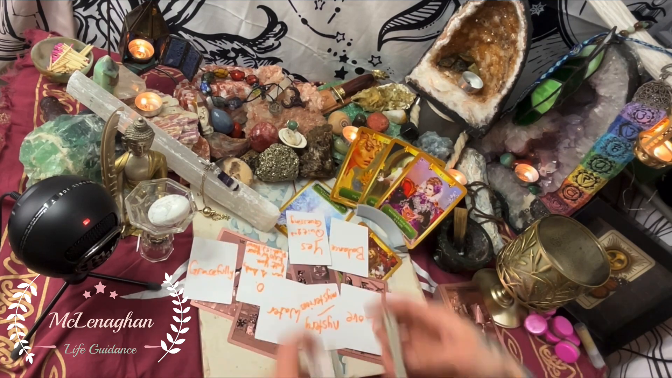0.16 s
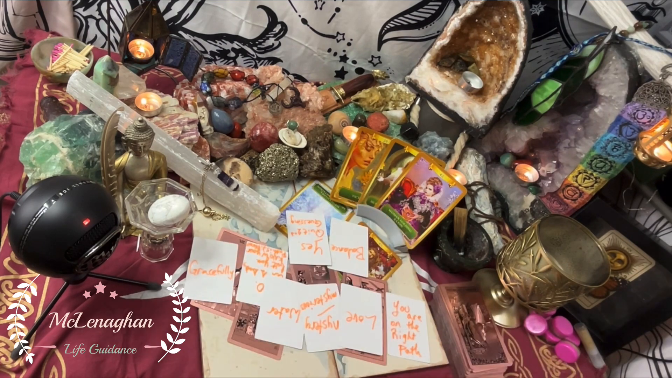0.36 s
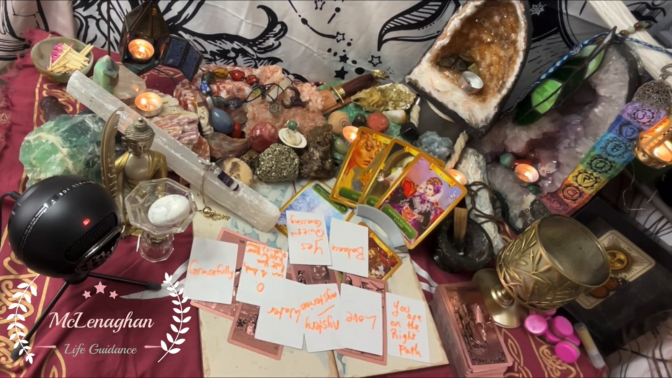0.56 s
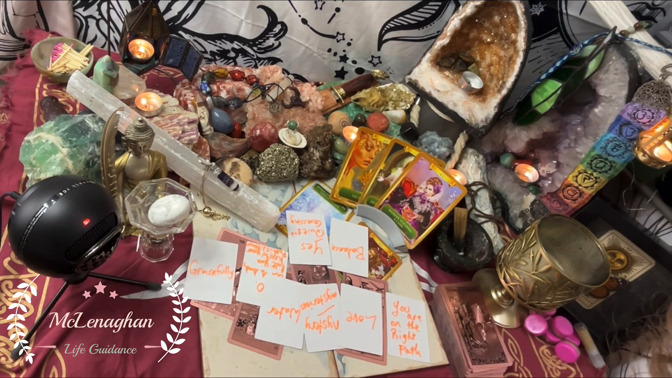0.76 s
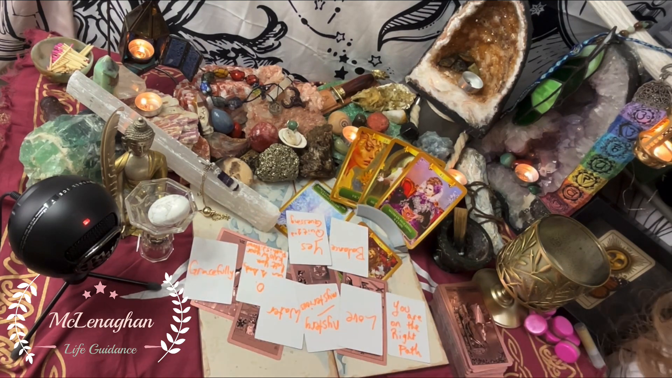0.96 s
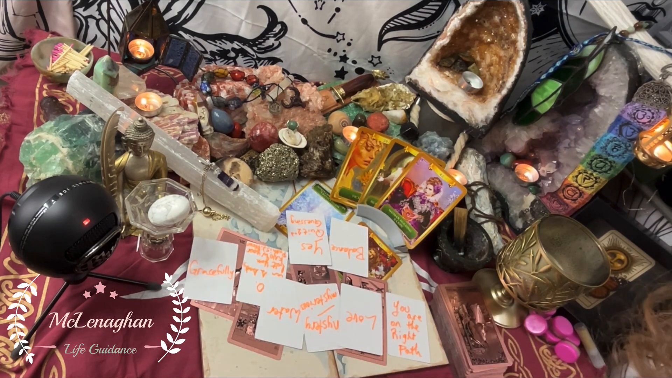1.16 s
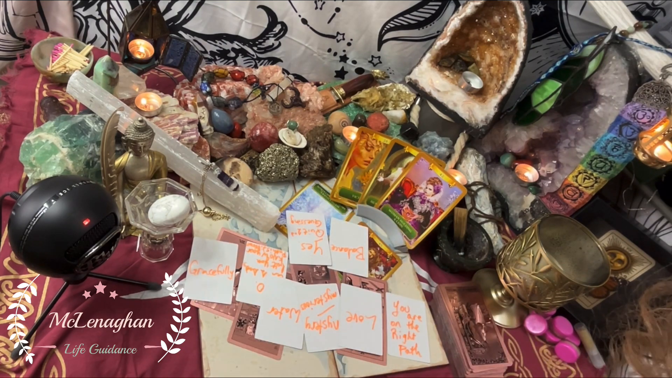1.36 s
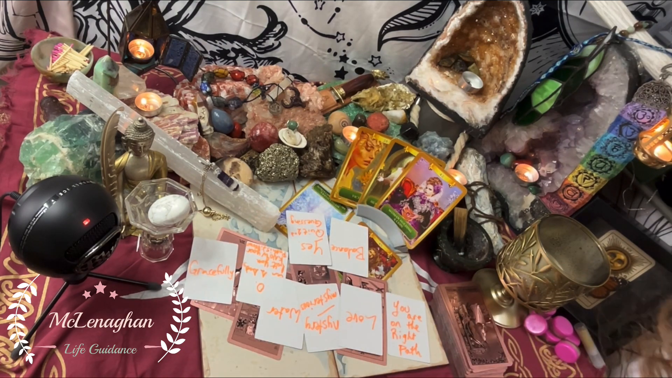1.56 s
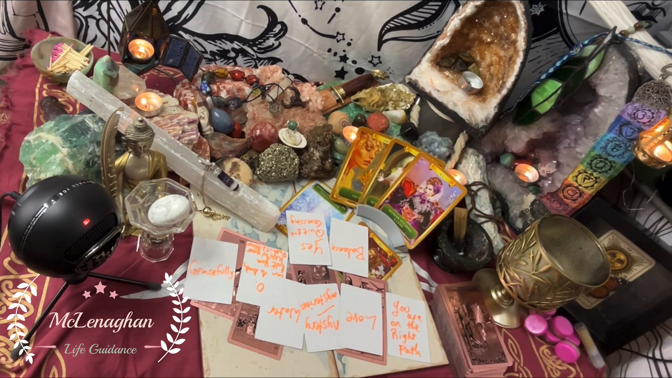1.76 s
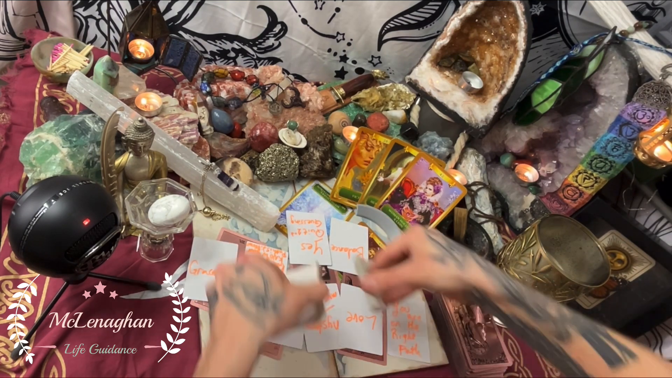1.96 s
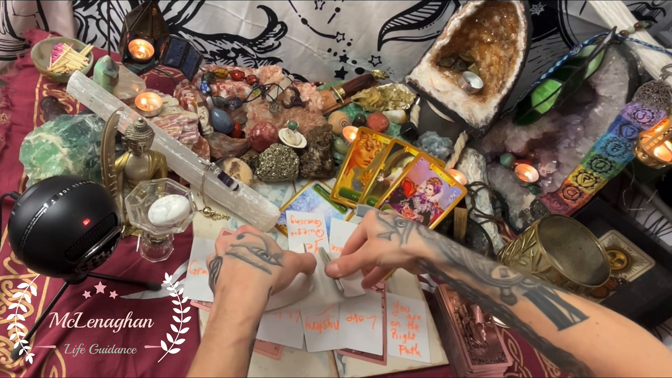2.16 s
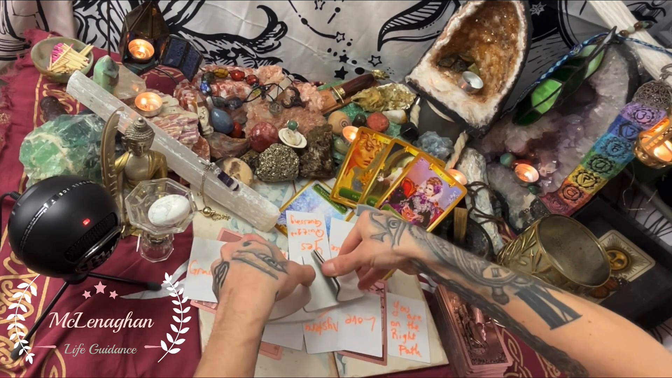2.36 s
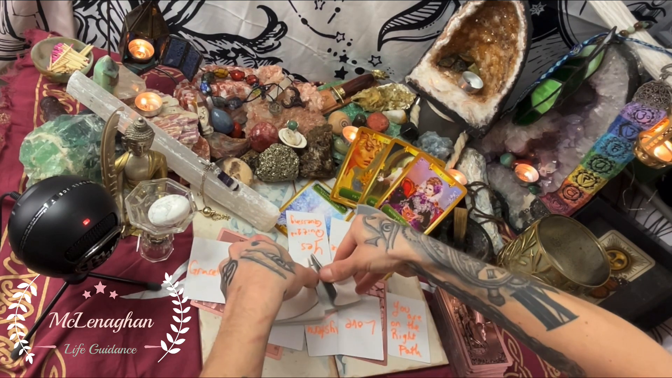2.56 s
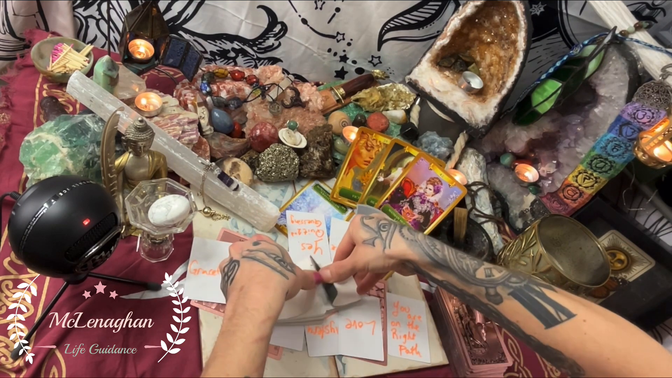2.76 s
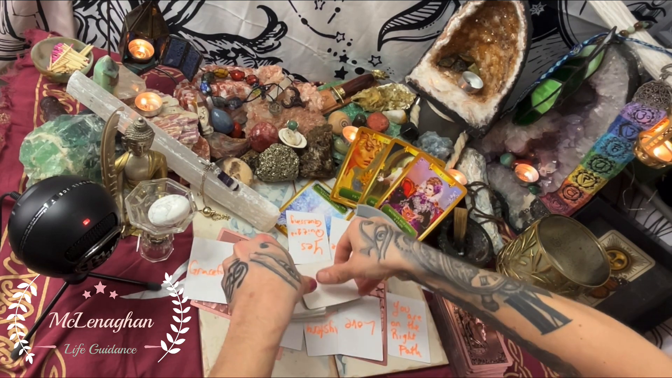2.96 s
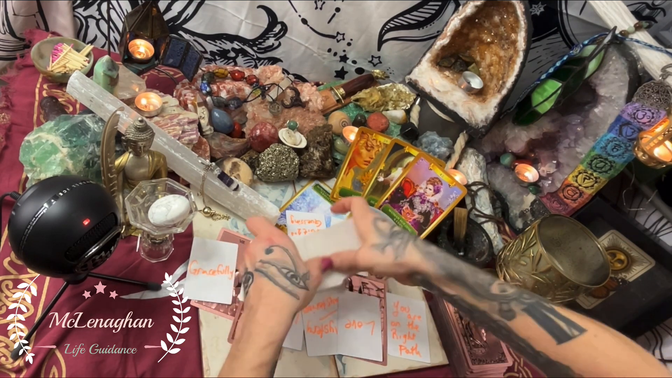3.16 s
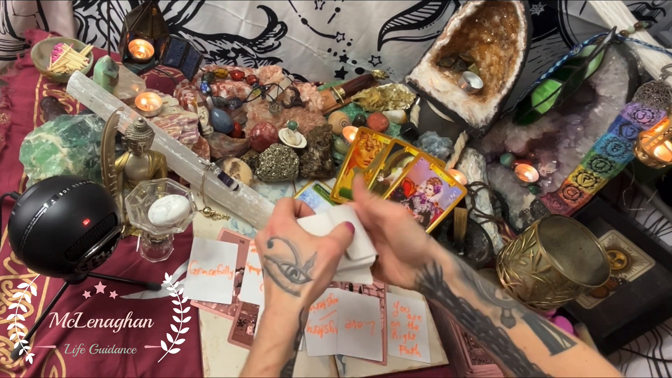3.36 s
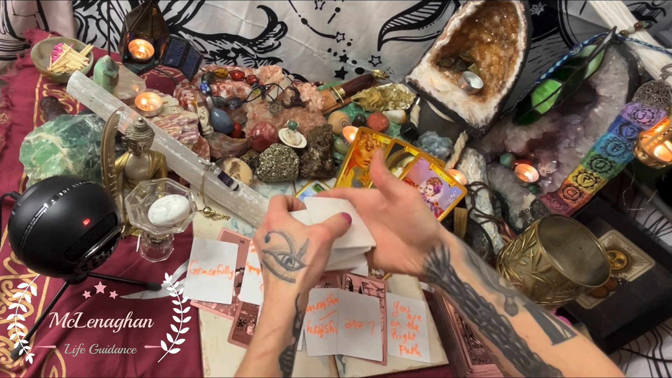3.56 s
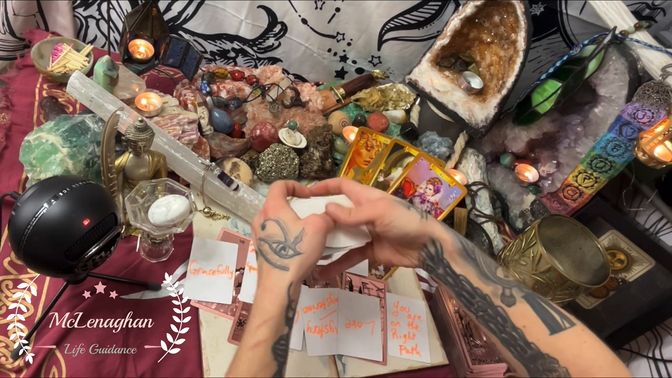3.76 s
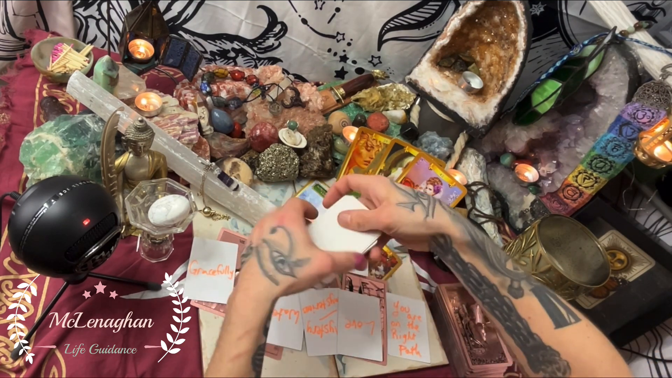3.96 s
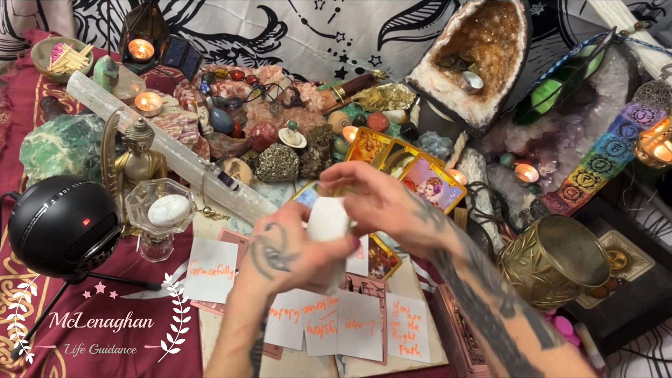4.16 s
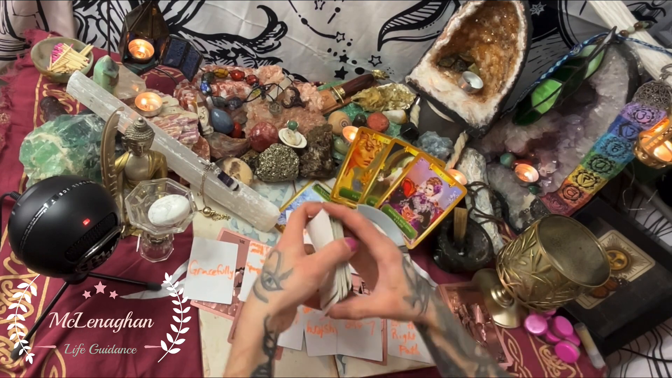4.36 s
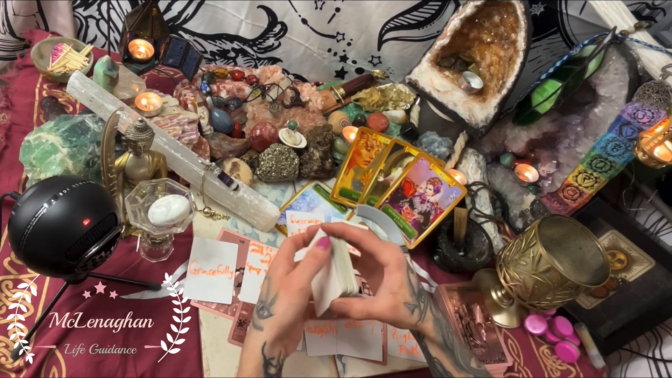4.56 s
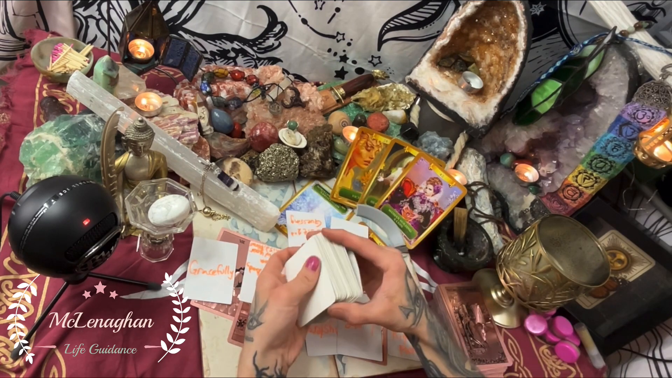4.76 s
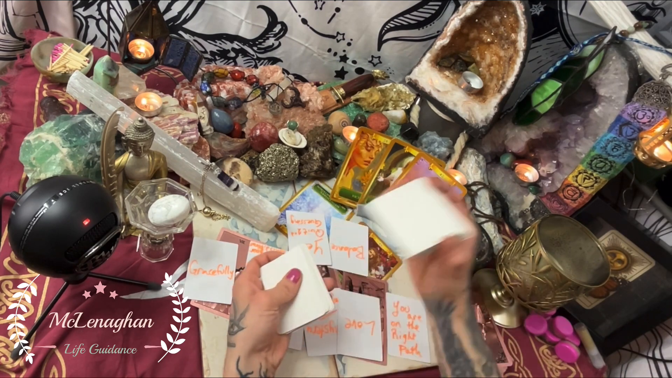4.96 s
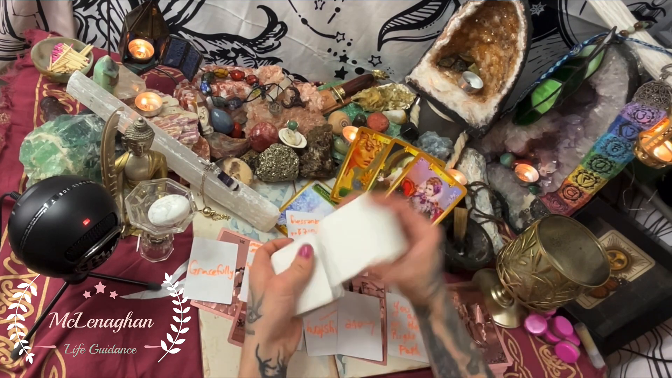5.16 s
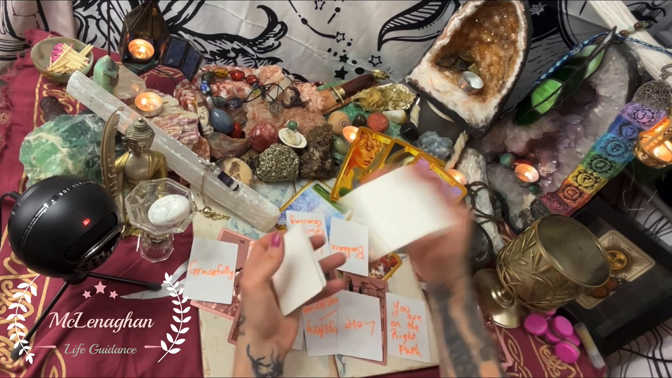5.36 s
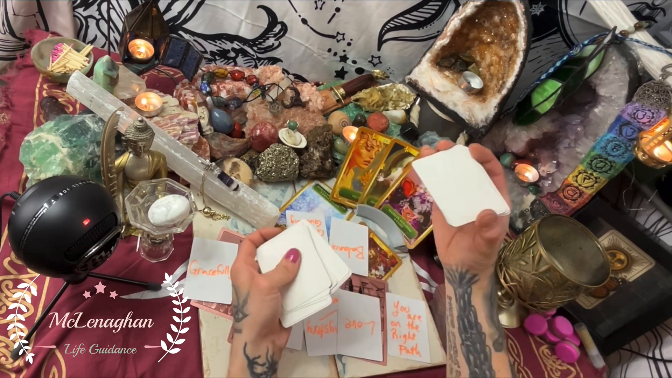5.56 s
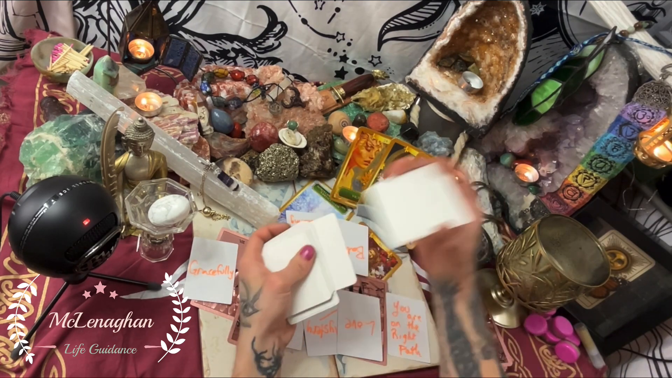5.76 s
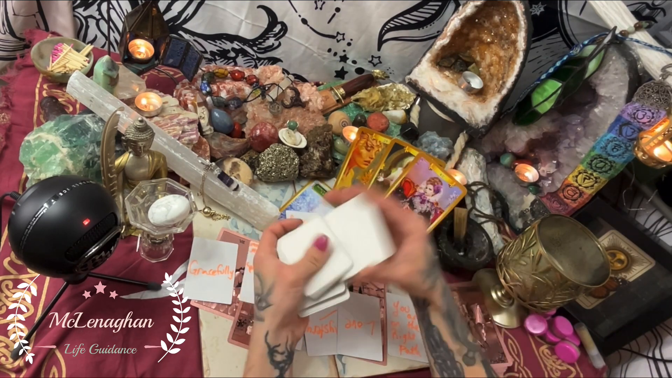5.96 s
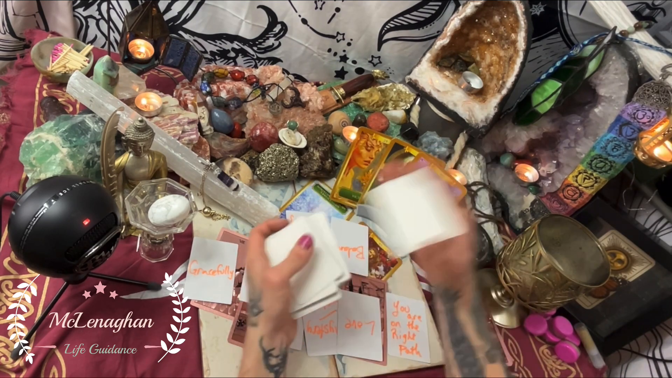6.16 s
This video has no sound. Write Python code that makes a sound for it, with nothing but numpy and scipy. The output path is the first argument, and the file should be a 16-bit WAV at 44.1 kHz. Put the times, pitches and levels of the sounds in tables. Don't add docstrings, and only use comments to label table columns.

```python
import sys
import numpy as np
from scipy import signal
from scipy.fft import rfft, irfft
from scipy.io import wavfile
from scipy.ndimage import uniform_filter1d

SR = 44100
rng = np.random.default_rng(int(sys.argv[2]) if len(sys.argv) > 2 else 0)


def voltage_ratio(level):
    return 10 ** (np.asarray(level, float) / 20)


def materialize(psi):
    bounded = np.clip(np.atleast_2d(psi).T, -1, 1)
    quanta = np.round(bounded * 32767).astype(np.int16)
    wavfile.write(sys.argv[1], SR, quanta)


N = 274331

RIFFLE_SLAPS = [(2.1687, -36, 3, 880, -4.5), (2.1812, -25.5, 3, 1230, -6.5), (2.1865, -29.5, -1, 970, -5),
                (2.1992, -28, 3, 2870, -10), (2.3075, -34, -11, 780, -16), (2.3157, -25, 0, 1050, -6),
                (2.3204, -26, -6.5, 750, -8), (2.4161, -40, -3, 1130, -6), (2.4296, -36.5, -3, 1110, -8.5),
                (2.5212, -24.5, -2, 3160, -6), (2.5408, -20.5, -7, 3180, -14),
                (2.5613, -29, -16.5, 2580, -5.5), (2.651, -26.5, 0, 845, -11),
                (2.6663, -20, -7.5, 1240, -17), (2.678, -28.5, 2, 1090, -3.5),
                (2.6857, -28.5, -2.5, 1190, -1), (2.6993, -24, -3.5, 1190, -14), (2.703, -28, 1, 980, -11),
                (2.7805, -38.5, -3, 960, -5), (2.7862, -17, 1, 1030, -9.5), (2.7948, -45, 4, 1150, -5),
                (2.9041, -19.5, -0.5, 5070, -3.5), (2.907, -21, 5.5, 1136, -5)]
EDGE_TICKS = [(0.3463, -46, 9, 1340, -20), (1.6478, -48, 4, 750, -13), (1.7087, -55.5, 0, 1100, -3),
              (2.2031, -20, -10, 2870, -10), (2.3531, -39, 1, 605, -11), (2.4822, -39, -11, 2910, -4),
              (2.4912, -42, -12, 2970, -6), (2.5174, -30, -5, 4400, -2), (2.5334, -19, -10.5, 2910, 2.5),
              (2.5494, -23, -2, 800, -10), (2.6605, -22, -6.5, 2160, -13), (2.6961, -19.5, 1.5, 4300, -8),
              (2.8489, -28, -12, 2080, -12), (2.8583, -35, -5, 647, -7), (3.0327, -44, 3, 7000, -11),
              (3.1899, -49, 0, 6000, -9), (3.2089, -42.5, -1, 5150, -3.5), (3.3241, -29.5, -3, 7360, -4),
              (3.3946, -34, 8.5, 4130, -31), (3.5578, -29.5, -3, 2870, -13), (3.5781, -50, 4, 8000, 1),
              (3.6025, -39, -1, 2980, -10), (3.7993, -49, -1, 8000, -4), (4.1243, -36, 0, 2700, -3.5)]
EDGE_FLICKS = [(4.1669, -39.5, -1, 1000, -12), (4.7599, -40.5, 7, 4360, -11),
               (4.8961, -44.5, 2, 4250, -8.5), (2.1915, -26, 18, 1930, -3),
               (5.1901, -30.5, 5, 2720, -7), (5.2068, -38, 3, 5000, -10), (5.4199, -28, -1, 4500, -13),
               (5.4275, -43.5, 0, 960, 5), (5.4379, -32.5, -2, 1110, -10), (5.4411, -38, 2, 1310, -1.5),
               (5.4492, -31, -2, 4500, -27), (5.4703, -46, -13, 2930, -4), (5.4819, -35, 6, 690, -18),
               (5.5015, -38.5, -4, 654, -6.5), (5.7311, -37, -2, 5300, -0.5),
               (5.7353, -33.5, 6, 880, -9), (5.7428, -38, -1, 930, -5), (5.9583, -36, -1.5, 1320, -16),
               (5.9617, -33, -8, 810, -10), (5.9806, -27, -7, 680, -12.5), (5.9857, -39, 18, 675, -8),
               (5.9947, -31.5, 10, 1230, -13), (3.6692, -28.5, 9, 3850, -10),
               (6.2168, -25, 1, 1910, -2)]
HAND_TOUCHES = [(1.374, -52, 2, 1080, -20), (3.107, -41.5, -11, 760, -11.5), (3.2515, -49, -9, 796, -8),
                (3.3255, -32.5, -15, 684, -4), (3.4913, -50, 4, 4000, -10), (3.5042, -31.5, -5, 2330, -3.5),
                (3.6187, -40, -12, 2520, -13), (3.6379, -45, -4, 3860, -2), (3.8235, -47, 2, 2460, -1),
                (4.5285, -47, 9, 3620, -7), (4.6197, -53.5, 1, 1010, -11), (4.8288, -50.5, -5, 2570, 2.5),
                (5.164, -43.5, 0, 940, -6.5), (5.4237, -33.5, -5, 2470, -1.5),
                (5.6998, -27.5, -1, 2160, -10.5), (5.7086, -28, -7, 2300, -12),
                (5.7139, -33.5, 15, 2440, -4), (5.7216, -41, 2, 2550, -5), (5.7505, -38.5, 2, 550, -1),
                (5.9912, -47, -22, 503, 9.5), (5.9995, -48.5, 2, 1083, 16)]
CLUSTER_CARDS = [(2.147, -50, -3, 1100, -3), (2.1585, -43.5, -6, 900, -4), (2.1788, -28, 11, 3180, -8),
                 (2.1925, -23, -8, 2980, -4.5), (2.3045, -42, 2, 6000, -10),
                 (2.3165, -27.5, -15.5, 2760, 1.5), (2.433, -41, 8, 1160, -5), (2.44, -43, -8, 3000, -4),
                 (2.4505, -48, -10, 900, 3), (2.5305, -29, 4, 4700, -6), (2.5375, -26, -10, 920, -10),
                 (2.649, -33, 2, 2500, -16), (2.6752, -25, 0, 2250, -7), (2.684, -31.5, 2, 1090, -6),
                 (2.783, -28, 6, 2000, -12), (2.9022, -25.5, 9, 6550, -5), (3.3262, -34.5, -17, 1240, 1.5),
                 (3.4955, -38, -4, 2270, -5), (3.5005, -34.5, -9, 1950, -5), (3.503, -28.5, -3, 4140, -6.5),
                 (3.5095, -39, -6, 2900, 1), (3.5135, -42, -4, 2500, 1), (3.52, -54, -6, 2500, 9),
                 (5.1715, -44, -5, 1300, -8), (5.4257, -33, -3, 1900, -1), (5.4283, -39, -2, 1310, -2.5),
                 (5.452, -39, 8, 8000, -7), (5.7008, -25.5, -3.5, 2320, 0.5), (5.978, -48, 8, 3000, -12),
                 (5.9965, -36, -12, 1470, -12)]
LOOSE_CARDS = [(3.038, -40, -14, 1200, -8), (3.054, -53, 8, 10000, -2), (3.068, -53, 1, 4000, -6),
               (3.2525, -55, 6, 9600, 2), (3.272, -54, -4, 2520, 3), (3.568, -52, 6, 7800, 2),
               (3.5745, -52, 4, 8000, 5), (3.5885, -51, 6, 8200, 4), (3.606, -45, 6, 8500, -3),
               (3.6155, -52, 6, 8000, 2), (3.6215, -53, 6, 8100, 1), (3.628, -51, 6, 8200, 5),
               (3.655, -53, 2, 4200, 3), (3.774, -59, 0, 4300, 0), (3.7925, -56, 0, 4500, -3),
               (3.7965, -50.5, -3, 2340, 2), (3.804, -51, -4, 4800, -2), (3.8225, -50, 5, 8300, 3),
               (3.8325, -44, -2, 2480, 1.5), (3.8515, -48.5, 2, 10000, -7), (4.904, -51, 1, 4200, -6),
               (4.1238, -47, 19, 14500, 5), (4.913, -60, 12, 14000, -2), (5.4375, -45, 0, 2300, -4)]
SLAP_MS, TICK_MS, FLICK_MS, TOUCH_MS = 2.8, 1, 0.76, 3.1
CLUSTER_MS, LOOSE_MS = 1.3, 0.96
# (time [s], peak [dB], brightness [dB], first swing [sign])
CORNER_SPIKES = [(2.1921, -14, 4, 1), (2.2031, -8.5, -2, -1), (2.3167, -18, 5, 1), (2.3492, -29, 3, -1),
                 (2.4645, -33, 10, 1), (2.5427, -28, -7, -1), (2.5494, -23, 5, 1), (2.6666, -13, 1, 1),
                 (2.6782, -12, 2, 1), (2.6858, -10, 1, 1), (2.7031, -13, 2, -1), (2.7862, -12, 10, 1),
                 (2.9047, -16, 2, 1), (2.9070, -3.5, -2, 1), (4.1244, -35, -2, 1), (4.1672, -27, -4, 1),
                 (5.2068, -22, 4, -1), (5.4211, -27, 3, 1), (5.4243, -32, 0, 1), (5.4411, -24, -4, -1),
                 (5.9806, -18.5, -9, -1), (5.9857, -27, 5, 1), (5.9947, -25, 8, -1), (3.0328, -27, 3, 1),
                 (3.107, -34, -1, 1), (6.2167, -16, 8, -1), (5.4247, -20, -7, -1)]
# (frequency [Hz], level [dB])
CRACK_SPECTRUM = [(60, -76), (350, -16.5), (800, -6), (3000, 2), (6000, -0.5), (10000, -0.5), (13000, -7.5),
                  (16000, -8)]

# (middle [s], level [dB], length [ms], brightness [dB])
FACE_STROKES = [(2.43, -52, 22, -2), (2.491, -52.5, 38, -4), (2.853, -46, 15, 10), (3.034, -47.5, 28.5, 0),
                (3.117, -50, 33, 4), (3.23, -59, 89, 1), (3.263, -59, 40, 8), (3.321, -43, 12, -4),
                (3.406, -57.5, 270, 1), (3.503, -36.5, 20.5, 4.5), (3.548, -48.5, 31, 5),
                (3.613, -49, 39, -5), (3.799, -57.5, 74, 3), (3.83, -52, 28, -2), (4.058, -58, 100, 4.5),
                (4.164, -54, 21, 7), (4.353, -51, 29, 3), (4.385, -59, 18, -4), (4.438, -49.5, 31, 3.5),
                (4.487, -54.5, 26, 2), (4.528, -49, 31, 3.5), (4.708, -60, 99, 3), (4.893, -52.5, 21, 6),
                (5.169, -51, 11, 12), (5.444, -47.5, 27, 1), (5.49, -68, 56, 4), (5.926, -57.5, 17, 3),
                (5.987, -45, 12, -13)]
# (middle [s], level [dB], length [ms])
FINGER_BRUSHES = [(0.025, -61.5, 45), (0.119, -61, 90), (0.337, -57.5, 64), (0.457, -58.5, 29),
                  (0.564, -62, 27), (0.634, -68.5, 110), (0.836, -55.5, 62), (0.974, -60.5, 73),
                  (1.075, -63, 42), (1.15, -68, 40), (0.243, -64.5, 26), (1.382, -63, 26), (1.529, -64, 35),
                  (2.009, -64, 14), (2.034, -66, 9.2), (2.14, -63, 14), (4.26, -72, 170), (3.674, -65, 65),
                  (3.916, -66, 71), (4.128, -55.5, 45), (4.764, -51, 6.9), (4.81, -57, 46),
                  (4.855, -57.5, 51), (5.036, -57.5, 17), (5.315, -61, 19), (5.359, -63, 22),
                  (5.82, -69.5, 420), (6.115, -62.5, 60), (6.065, -64, 34), (6.198, -60.5, 22),
                  (5.681, -59, 34), (5.14, -64.5, 96)]
BRUSH_BRIGHT_DB = 7
# (frequency [Hz], level [dB])
BENDING_SPECTRUM = [(900, -24), (2300, -9), (3200, -12), (4100, -2), (5000, -6), (6000, -2), (8000, -20)]
# (frequency [Hz], level [dB])
SKIN_SPECTRUM = [(4500, -63), (6200, -21.5), (7200, -9.5), (8500, -7), (10000, -7), (11500, -10.5),
                 (13500, -9.5), (16000, -13)]

# (time [s], peak [dB],
# frequency [Hz], first swing [sign])
AIR_PUFFS = [(2.176, -28.5, 56, 1), (2.3172, -25.5, 52.5, -1), (2.531, -40, 49.3, 1), (2.652, -34, 110, -1),
             (2.672, -29, 118, 1), (2.782, -44, 60, 1), (2.846, -36, 139, -1), (2.854, -27, 133, 1),
             (2.899, -48, 110, 1), (3.318, -64, 100, -1), (2.906, -17.5, 570, 1), (2.32, -24.5, 100, -1),
             (3.3226, -18, 437, -1), (4.898, -41.5, 61, -1), (5.204, -35, 56, -1), (5.479, -31, 54.6, -1),
             (5.495, -28, 61, 1), (5.695, -39, 69.6, 1), (5.746, -21, 54, 1), (5.971, -37, 80, -1),
             (5.992, -28.5, 74.4, 1), (6.2165, -25, 90, -1)]

# (time [s], quick sway [dB], slow sway [dB])
TABLE_BUMPS = [(0.5, -72, -40), (2.17, -33, -50), (2.32, -24, -45), (2.37, -32, -44), (2.5, -28.5, -38),
               (2.74, -41, -39), (2.86, -47, -33), (2.95, -35, -46), (3.4, -72, -44.5), (4.2, -45, -52),
               (5.9, -75, -46)]
QUICK_HZ, QUICK_RISE_S, QUICK_FADE_S = 38, 0.025, 0.11
SLOW_HZ, SLOW_RISE_S, SLOW_FADE_S = 17.5, 0.037, 0.32
REST_DB = -63

# (frequency [Hz], density [dB per Hz])
FAN_AIR = [(18, -7), (30, -0.5), (156, -8), (214, -2.5), (293, -6.5), (423, -2.5), (535, -14.5),
           (626, -7.5), (772, -14), (1240, -8), (1980, -19), (2510, -18), (3180, -26.5), (9800, -35.5),
           (15700, -44)]
FAN_AIR_DB = -52.5
# (frequency [Hz], width [Hz], level [dB])
FAN_DUCT = [(350, 35, -70), (652.5, 20, -69.5), (1193, 360, -61)]
# (shaft order, level [dB])
SHAFT_ORDERS = [(2, -65), (3, -71), (4, -58), (6, -91), (8, -80), (12, -65.5)]
SHAFT_HZ = 52.26

# (frequency [Hz], t60 [s])
ROOM_T60 = [(200, 0.31), (1000, 0.23), (4000, 0.2), (14000, 0.14)]
# (frequency [Hz], level [dB])
PHONE_LIMIT = [(15800, 0), (15950, -30), (16700, -36), (16950, -60)]


def evened(x):
    return x / np.sqrt(np.mean(x ** 2) + 1e-20)


def read(points, hz):
    f, value = np.transpose(points)
    return np.interp(np.log(hz + 1), np.log(f + 1), value)


def add(mix, s, sound):
    part = mix[max(round(s * SR), 0):][:len(sound)]
    part += sound[:len(part)]


def coloured(x, points, tilt_db=0):
    hz = np.fft.rfftfreq(len(x), 1 / SR)
    gain_db = read(points, hz) + tilt_db * np.log2((hz + 50) / 7000)
    return evened(irfft(rfft(x) * voltage_ratio(gain_db), len(x)))


def resonate(x, hz, width_hz):
    r = np.exp(-np.pi * width_hz / SR)
    return signal.lfilter([1 - r], [1, -2 * r * np.cos(2 * np.pi * hz / SR), r * r], x)


def drift(hz):
    lowpass = signal.butter(2, hz, fs=SR, output="sos")
    return evened(signal.sosfilt(lowpass, rng.standard_normal(N)))


def snaps(rows, tear_ms):
    out, t = np.zeros(N), np.arange(2048) / SR
    noise = rng.standard_normal((len(rows), 3, 2048))
    tear_s = max(tear_ms, .1) / 1000
    rise = 1 - np.exp(-(t / (.45 * tear_s + .0002)) ** 2)
    fall = np.exp(-t / (.9 * tear_s + .0004)) + 0.13 * np.exp(-t / 0.0072)
    shape = np.roll(rise * fall, 64)
    for (s, db, bright_db, hz, ring_db), (hiss, grit, knock) in zip(rows, noise):
        gritty = hiss * voltage_ratio(5.6 * np.clip(grit, -2, 1.5)) * shape
        crack = coloured(gritty, CRACK_SPECTRUM, 0.64 * bright_db) * np.sqrt(np.mean(shape ** 2))
        push = knock * shape ** 1.06
        push[70] += 6.0
        packet = evened(resonate(push, hz, 0.085 * hz + 110))
        whole_deck = evened(resonate(push, 1200, 340))
        ring = packet + 0.31 * min(3000 / hz, 1) ** 2 * whole_deck
        ring *= 1.574 / (abs(ring).max() + 1e-12)
        add(out, s - .0021, voltage_ratio(db + 4.5) * (crack + voltage_ratio(ring_db + 2.5) * ring))
    return out


def spikes():
    out, pulse = np.zeros(N), np.zeros(512)
    pulse[256], pulse[259] = 1, -.6
    for s, db, bright_db, sign in CORNER_SPIKES:
        click = coloured(pulse, CRACK_SPECTRUM, 0.6 * bright_db) * np.hanning(512)
        add(out, s - 256 / SR, np.sign(sign) * voltage_ratio(db) * click / abs(click).max())
    return out


def patchy(x, depth_db):
    z = signal.stft(x, nperseg=256)[2]
    patches = rng.standard_normal(z.shape[::-1]).T
    patches = uniform_filter1d(patches, size=5, axis=0)
    patches = uniform_filter1d(patches, size=14, axis=1)
    return evened(signal.istft(z * voltage_ratio(depth_db * evened(patches)), nperseg=256)[1][:N])


def rub():
    t = np.arange(N) / SR
    dull_power, bright_power = np.zeros(N), np.zeros(N)
    brushes = [(*row, BRUSH_BRIGHT_DB) for row in FINGER_BRUSHES]
    for s, db, ms, bright_db in FACE_STROKES + brushes:
        late = (t - s) / (max(ms, 2) / 1000)
        before = 1 / (1 + 1.65 * late ** 2) ** 2
        after = 1 / (1 + 4.1 * late ** 2)
        swell = voltage_ratio(db) * np.where(late < 0, before, after)
        dull_power += (swell * voltage_ratio(-bright_db / 2)) ** 2
        bright_power += (swell * voltage_ratio(bright_db / 2)) ** 2
    clumps_db = 1.5 * rng.standard_normal(N) + 1.2 * drift(90)
    catches = rng.standard_normal((2, N)) * voltage_ratio(clumps_db)
    catches += 4 * rng.standard_normal(N) * (rng.random(N) < 700 / SR)
    dull = patchy(coloured(catches[0], BENDING_SPECTRUM), 2.8)
    bright = patchy(coloured(catches[1], SKIN_SPECTRUM), 2.0)
    return voltage_ratio(-3.0) * np.sqrt(dull_power) * dull + voltage_ratio(-5.5) * np.sqrt(bright_power) * bright


def puffs():
    out, t = np.zeros(N), np.arange(4000) / SR
    for s, db, hz, sign in AIR_PUFFS:
        turns = hz * t
        swing = np.sin(2 * np.pi * turns) * turns * 2.08 * np.exp(-2.4 * turns)
        add(out, s, np.sign(sign) * voltage_ratio(db + 3.0) * swing)
    return out


def rocking(db, rise_s, fade_s):
    late_s = np.maximum(np.arange(N) / SR - np.array(TABLE_BUMPS)[:, :1], 0)
    swing = voltage_ratio(db)[:, None] * (1 - np.exp(-late_s / rise_s)) / (1 + late_s / fade_s) ** 2
    return np.sqrt((swing ** 2).sum(0) + voltage_ratio(REST_DB) ** 2)


def sway():
    quick_db, slow_db = np.transpose(TABLE_BUMPS)[1:]
    quick = np.sin(2 * np.pi * np.cumsum(QUICK_HZ * (1 + 0.0454 * drift(5.1))) / SR)
    slow = np.sin(2 * np.pi * np.cumsum(SLOW_HZ * (1 + 0.0614 * drift(1.39))) / SR)
    quick *= rocking(quick_db, QUICK_RISE_S, QUICK_FADE_S)
    slow *= rocking(slow_db, SLOW_RISE_S, SLOW_FADE_S) * voltage_ratio(2.6 * drift(8.6))
    return quick + slow


def fan():
    swell_db = .4 * drift(5)
    air = voltage_ratio(FAN_AIR_DB - 3.0 + swell_db) * coloured(rng.standard_normal(N), FAN_AIR)
    duct = np.zeros(N)
    for hz, width_hz, db in FAN_DUCT:
        duct += voltage_ratio(db) * evened(resonate(rng.standard_normal(N), hz, width_hz))
    turns = np.cumsum(SHAFT_HZ * (1 + 0.0027 * drift(0.87))) / SR
    hum = np.zeros(N)
    for order, db in SHAFT_ORDERS:
        level = voltage_ratio(db - 1.5 + 1.8 * drift(6.4))
        hum += level * np.sin(2 * np.pi * (order * turns + rng.random()))
    return air + duct + hum


def room(x):
    hz, t, z = signal.stft(rng.standard_normal(SR // 2), SR, nperseg=128)
    decay = voltage_ratio(-60 * t / read(ROOM_T60, hz)[:, None])
    tail = signal.istft(z * decay, SR, nperseg=128)[1]
    tail = np.r_[np.zeros(130), tail]
    return signal.fftconvolve(x, tail / np.linalg.norm(tail))[:N]


def scene():
    cards = snaps(RIFFLE_SLAPS, SLAP_MS) + snaps(EDGE_TICKS, TICK_MS)
    cards += snaps(EDGE_FLICKS, FLICK_MS) + snaps(HAND_TOUCHES, TOUCH_MS)
    cards += snaps(CLUSTER_CARDS, CLUSTER_MS) + snaps(LOOSE_CARDS, LOOSE_MS)
    cards += spikes()
    background = rub() + puffs() + sway() + fan()
    return (cards + voltage_ratio(-17.0) * room(cards) + background)[None]


def roll_off(x):
    return signal.sosfilt(signal.butter(12, 16990, fs=SR, output="sos"), x)


def record(dry):
    limit = voltage_ratio(read(PHONE_LIMIT, np.fft.rfftfreq(N, 1 / SR)))
    mix = irfft(rfft(dry) * limit, N)
    return roll_off(mix)


dry = scene()
out = record(dry)
materialize(out)
```